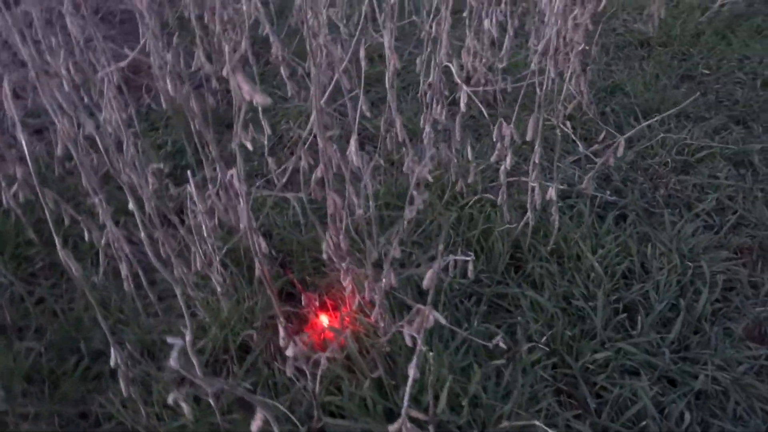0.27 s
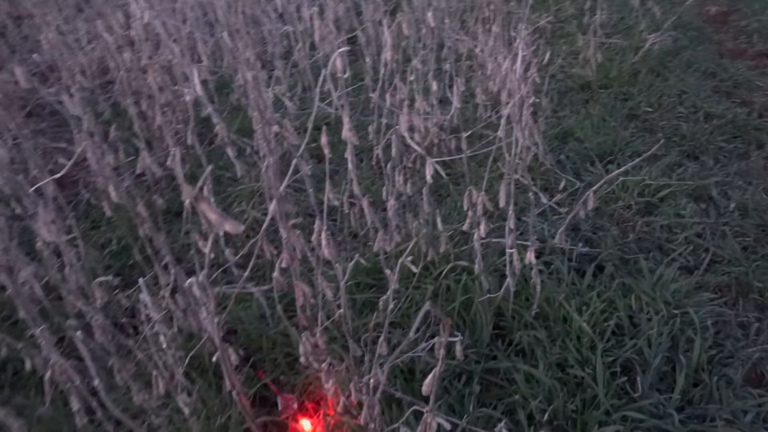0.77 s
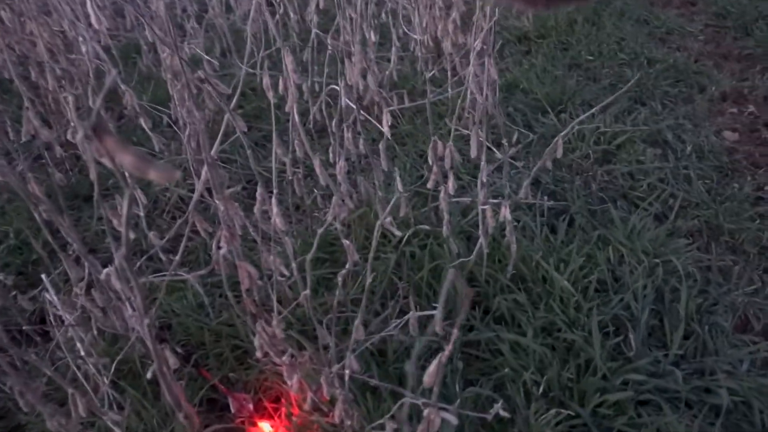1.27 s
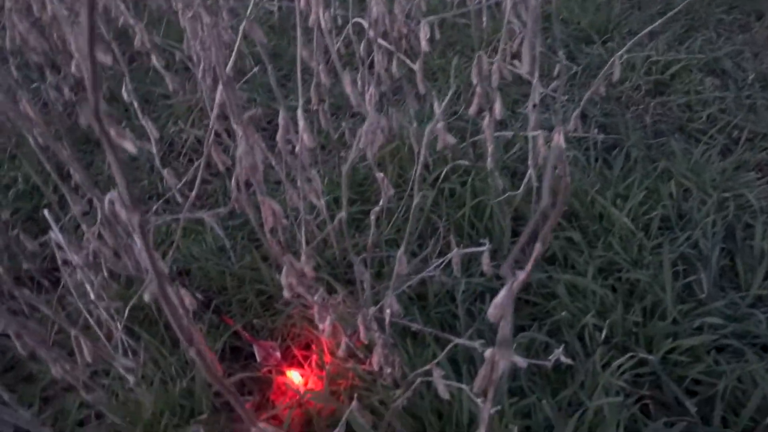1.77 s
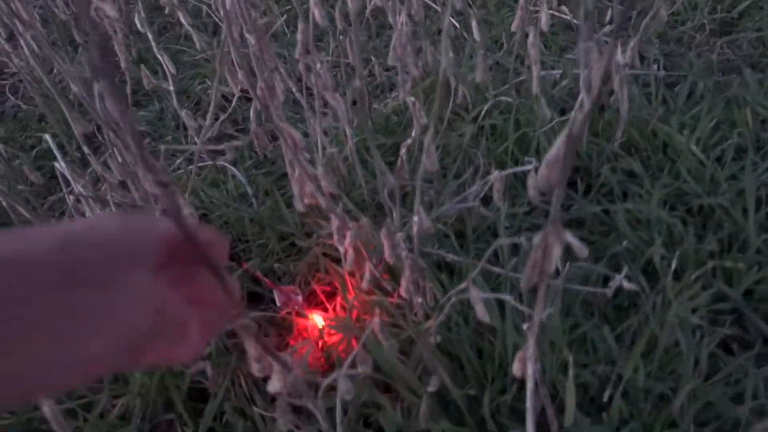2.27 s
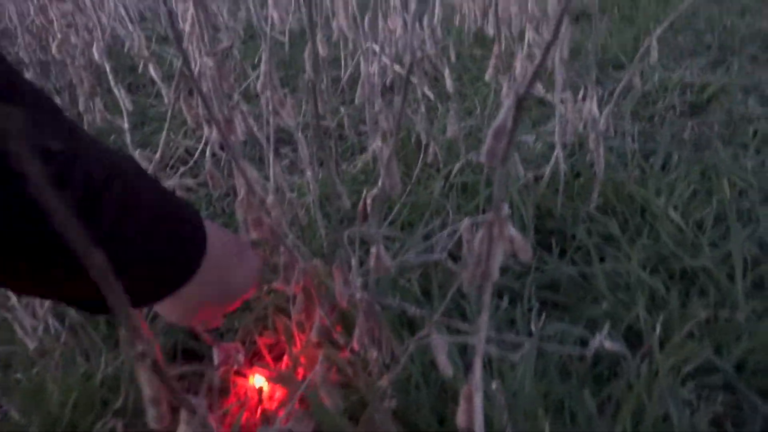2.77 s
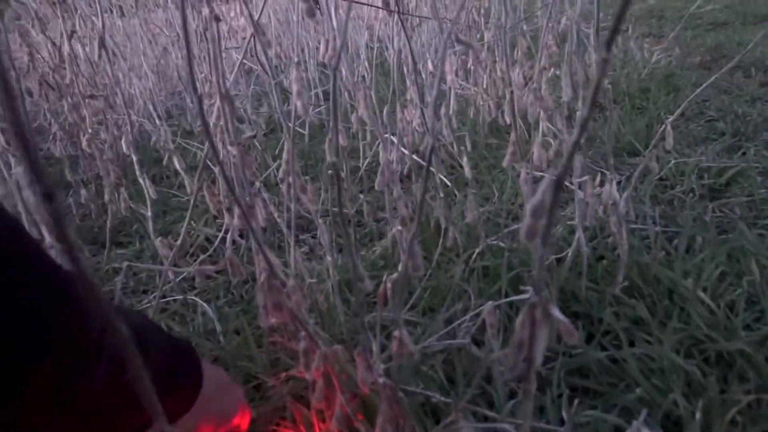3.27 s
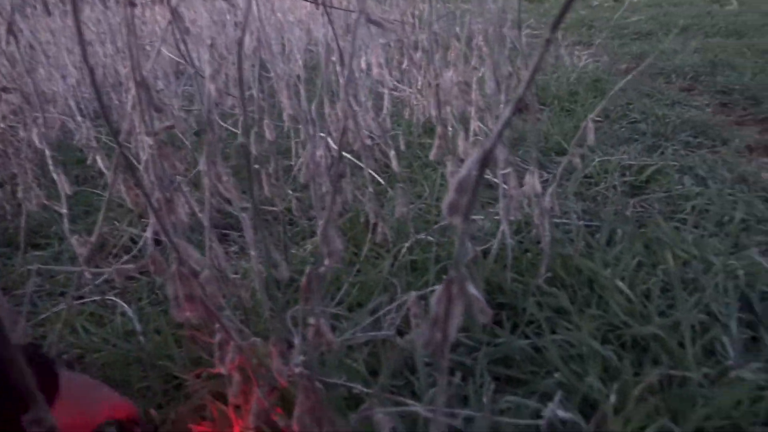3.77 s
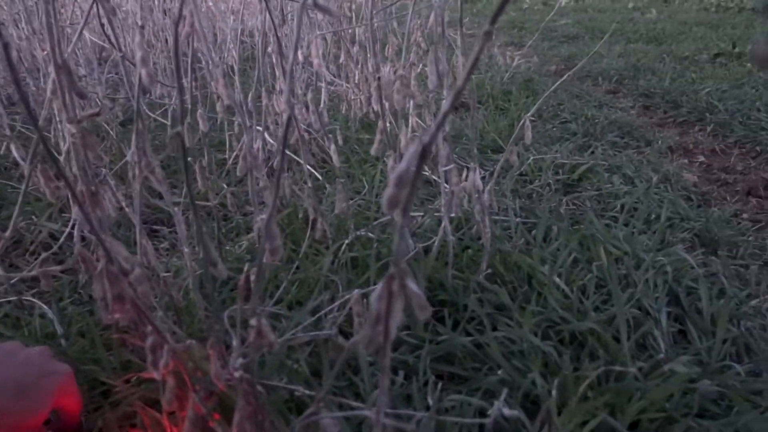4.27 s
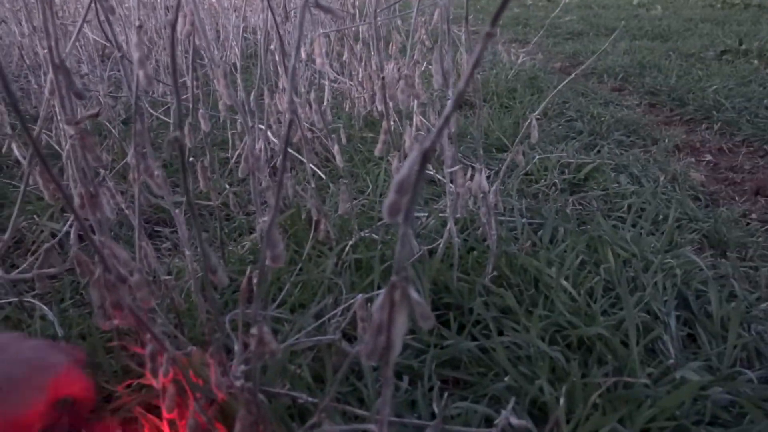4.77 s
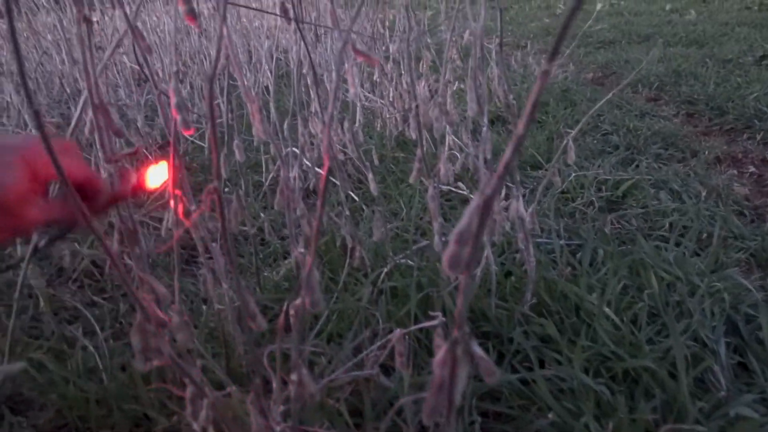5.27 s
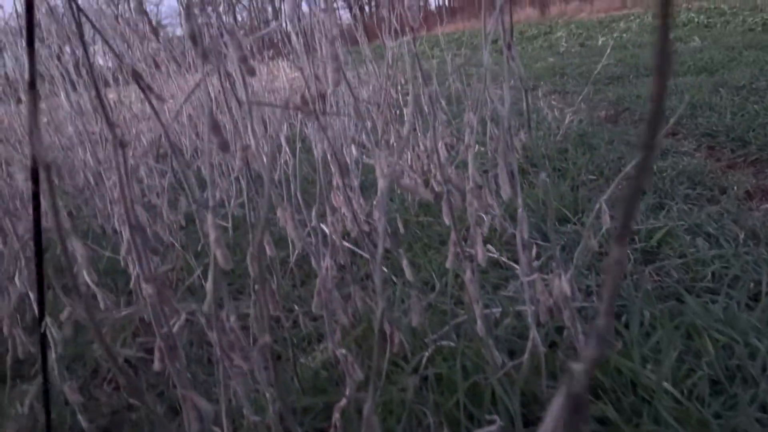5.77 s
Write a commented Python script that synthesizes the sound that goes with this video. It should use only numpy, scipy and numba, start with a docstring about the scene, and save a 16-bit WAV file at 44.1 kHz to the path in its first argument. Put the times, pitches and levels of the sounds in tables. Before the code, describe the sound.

Dry stalks and seed pods rustle and snap as someone reaches in with a small camera, dull body knocks, quiet open field behind.

```python
"""Pods and cloth rustle and stalks snap as someone crouches among dry bean plants with a small camera.
The field around is quiet: a smooth distant hiss and a faint far hum, made of shaped noise and two sines.
The camera body takes dull knocks (damped, falling sines) and rumbles and creaks in the hand (low noise).
Scrapes and snaps are noise in resonances, some narrow, some broad; each stroke through the plants is
crackle and hiss ringing in pods, thin husks and stems. All reaches the one microphone, in the camera."""
import sys
import numpy as np
from scipy import signal
from scipy.fft import rfft, irfft
from scipy.io import wavfile
from scipy.ndimage import uniform_filter1d
from numba import njit

SR = 44100
rng = np.random.default_rng(int(sys.argv[2]) if len(sys.argv) > 2 else 0)


def transcribe(signal):
    """Save signal, clipped to [-1, 1], as a 16-bit WAV file at the path in sys.argv[1]."""
    frames = np.atleast_2d(signal).T
    limited = np.clip(frames, -1, 1)
    pcm = np.round(limited * 32767).astype(np.int16)
    wavfile.write(sys.argv[1], SR, pcm)


N = 265482  # samples, about 6 s


def undb(db):
    """Gain of a dB value."""
    return 10 ** (np.asarray(db) / 20)


def unit(x):
    """Scaled to rms 1."""
    return x / np.sqrt(np.mean(x ** 2))


def curves(table):
    """Columns of a table joined by straight lines, one value a sample."""
    s, *columns = np.transpose(table)
    t = np.arange(N) / SR
    return [np.interp(t, s, column) for column in columns]


@njit
def svf(x, hz, width):
    """State-variable band-pass, gain 1 at the centre; hz and width in Hz."""
    y, band, low = np.empty(len(x)), 0., 0.
    g, damping = np.tan(np.pi * hz / SR), width / hz
    for i in range(len(x)):
        v = (band + g * (x[i] - low)) / (1 + g * (g + damping))
        band = 2 * v - band
        low = low + 2 * g * v
        y[i] = damping * v
    return y


def steep(x, hz, width):
    """The band-pass applied twice."""
    hz, width = 1. * hz, 1. * width
    return svf(svf(x, hz, width), hz, width)


def walk(rate):
    """Random levels, rate of them a second, joined by straight slopes; rms 1."""
    k = int(SR / rate)
    steps = np.repeat(rng.standard_normal(N // k + 1), k)
    return unit(uniform_filter1d(steps, k)[:N])


def add(out, s, sound):
    """Mix a sound in from second s."""
    i = int(s * SR)
    out[i:i + len(sound)] += sound[:N - i]


# Colour of the distant hiss, joined over log pitch: pitch_hz [Hz], relative_level_db [dB per Hz]
HISS_COLOUR = [(35, -33), (60, -8), (168, -53), (238, 12), (389, 1), (1220, -10), (5210, -32), (14600, -13),
               (16000, -11)]
# Lines of the far hum: pitch_hz [Hz, wavering], level_db [dB, sine peak, wavering]
HUM_LINES = [(117, -61), (233, -57)]
HISS_DB = -59.5  # rms


def field():
    """Far off: smooth noise of a fixed colour, and sines whose pitch wanders together, each level alone."""
    hz, db = np.transpose(HISS_COLOUR)
    bins = np.arange(N // 2 + 1) * SR / N + 1  # 1 Hz up, so that the log exists
    colour = undb(np.interp(np.log(bins), np.log(hz), db))
    hiss = irfft(rfft(rng.standard_normal(N)) * colour, N)
    drift = np.cumsum(1 + 0.00637 * walk(5.1)) / SR  # time running slightly unevenly, s
    hum = np.zeros(N)
    for line_hz, line_db in HUM_LINES:
        hum += undb(line_db + 2.4 * walk(3.8)) * np.sin(2 * np.pi * line_hz * drift)
    return undb(HISS_DB) * unit(hiss) + hum


# Grip and air moving at the microphone, points on two level curves:
# time_s [s], rumble_db [dB, deep rumble], creak_db [dB, low creak]
GRIP_LEVELS = [(0.0, -43.5, -55), (0.4, -49.5, -50), (0.76, -47.5, -55.5), (1.25, -48.5, -48.5),
               (1.85, -45.5, -53), (2.18, -43.5, -54.5), (2.34, -41.5, -45), (2.44, -37, -37.5),
               (2.53, -52, -41), (2.69, -45, -45.5), (2.77, -43, -32.5), (2.84, -27, -44),
               (3.02, -39, -43.5), (3.14, -42.5, -50.5), (3.64, -43.5, -49.5), (3.82, -50, -47),
               (4.11, -45.5, -53), (4.85, -50.5, -52), (5.08, -36.5, -43), (5.2, -46, -46.5),
               (5.6, -46, -43.5), (5.72, -48, -48), (5.82, -45, -43), (6.02, -41, -47)]


def handling():
    """At the microphone: deep rumble and a low, uneven creak carried through the camera body."""
    rumble_db, creak_db = curves(GRIP_LEVELS)
    rumble = steep(rng.standard_normal(N), 30.8, 27.7)
    creak = steep(rng.standard_normal(N), 91, 290)
    creak = creak * undb(4.4 * np.tanh(walk(25)))
    return undb(rumble_db) * unit(rumble) + undb(creak_db) * unit(creak)


# Knocks on the camera body: start_s [s], level_db [dB, envelope peak], pitch_hz [Hz, lowest mode at the blow],
# t60_s [s to fade 60 dB], drop_octaves [octaves the pitch falls in the end]
BODY_KNOCKS = [(.431, -25.5, 338, 0.092, 0.45), (0.904, -33.5, 328, 0.035, 0.27),
               (0.9409, -24.5, 587, 0.0054, .2), (1.012, -36.5, 533, 0.045, 0.12),
               (1.2327, -27, 325, 0.023, .5), (1.244, -33.5, 296, .06, 0.38),
               (1.372, -33, 333, 0.0093, 0.75), (1.83, -24, 357, 0.042, 0.87),
               (2.74, -30, 140, 0.053, 0.43), (2.759, -22.5, 304, 0.023, 0.72),
               (2.771, -16.5, 47, 0.27, 0.27), (2.916, -32.5, 309, 0.062, 0.28),
               (3.051, -31.5, 131, 0.11, 0.99), (3.257, -24.5, 172, 0.034, 2.9),
               (4.293, -31.5, 130, 0.054, 1.2), (5.51, -23.5, 230, 0.1, 2.6),
               (5.646, -28.5, 221, 0.075, 0.27), (5.668, -10.5, 264, 0.066, 0.78),
               (5.670, -22, 830, 0.029, 0.65), (5.677, -10.5, 141, 0.028, 1.9),
               (5.974, -20, 223, 0.056, 2.5)]


def knocks():
    """A few damped swings that slow down as the blow is absorbed; higher shell modes die sooner."""
    out, t = np.zeros(N), np.arange(16000) / SR
    for s, db, hz, t60, drop in BODY_KNOCKS:
        octaves = -drop * (1 - np.exp(-t / 0.011))
        turns = np.cumsum(hz * 2 ** octaves) / SR
        fade = np.exp(-np.log(1000) * t / t60)
        shape = (1 - np.exp(-t * hz / 0.82)) * fade  # low pitches set in more slowly
        shell = np.sin(2 * np.pi * 1.366 * turns) + 0.33 * np.sin(2 * np.pi * 2.44 * turns)
        swing = np.sin(2 * np.pi * turns) + .5 * fade * shell
        add(out, s, undb(db) * shape / shape.max() * swing)
    return out


# Short rough scrapes and squeaks, and a low rattling rumble: start_s [s], length_s [s], pitch_hz [Hz],
# width_hz [Hz, of each of two filter passes], level_db [dB, rms before the swell]
ROUGH_SCRAPES = [(1.717, 0.086, 4940, 900, -42.5), (2.286, 0.028, 4700, 2000, -30.5),
                 (2.289, 0.027, 8800, 5000, -35.5), (2.36, 0.14, 110, 129, -27),
                 (2.429, 0.083, 5240, 500, -36.5), (4.228, 0.032, 3960, 4200, -35.5),
                 (5.089, 0.074, 4900, 600, -28), (5.017, 0.17, 280, 96, -43),
                 (5.467, 0.048, 5200, 2000, -27), (5.766, 0.024, 1370, 300, -31)]


def scrapes():
    """Rough noise in one resonance, narrow or broad, under a smooth swell and fade."""
    out = np.zeros(N)
    noises = rng.standard_normal((len(ROUGH_SCRAPES), 2, 8000))
    for (s, length, hz, width, db), noise in zip(ROUGH_SCRAPES, noises):
        n = min(int(length * SR), 8000)
        slips = undb(42 * uniform_filter1d(noise[1], size=100))  # the grip catches and lets go
        rough = unit(steep(slips * noise[0], hz, width))
        add(out, s, undb(db) * np.hanning(n) * rough[:n])
    return out


# Stalks and pods that snap: start_s [s], level_db [dB, peak of the ring alone], pitch_hz [Hz, ring],
# dull_db and bright_db [dB, peaks of the dull and bright parts relative to the ring]
STALK_SNAPS = [(0.6662, -34.5, 6100, -12, -12), (0.7094, -35.5, 7000, -4, -12),
               (0.7597, -36, 4400, -21, -23), (0.783, -37.5, 3430, -18, -6), (1.1186, -20, 3500, 4, 0.5),
               (1.4056, -38, 2370, -7, 7.5), (1.2468, -38, 1110, 10, 2), (1.6896, -33, 4840, -5, -17),
               (1.8429, -14.5, 6300, -21, -17), (2.0869, -31.5, 3860, 1, 1), (2.1795, -21, 4700, -3, 3.5),
               (2.2081, -24, 4300, -18, -22), (2.2457, -24, 3400, 2, 8), (2.509, -28.5, 4330, -17, 14.5),
               (2.543, -30.5, 4300, -8, 10), (2.602, -20.5, 4400, -16, -34), (2.6498, -23, 5260, -5.5, 2),
               (2.744, -24, 6000, -19, 5), (2.75, -6, 5400, -16, -12), (2.7594, -9.5, 4100, -18, 0.5),
               (2.7753, -9.5, 5300, -28, -8), (2.791, -22, 5200, -21, -9), (2.8058, -13.5, 5100, -26, -12),
               (2.817, -27, 5400, -8, -19), (2.8478, -22, 3460, -11, 8), (2.924, -14.5, 5070, -26, -9),
               (2.9879, -22, 3900, -20, 4), (3.0096, -21, 1900, -31, -24), (3.28, -31.5, 4000, -17, -3),
               (3.3702, -34, 3400, -15, 0), (3.406, -15, 2200, -17.5, -15), (3.6647, -29.5, 5360, -11, 6),
               (3.748, -31, 2600, -18, -11), (3.7793, -9, 3200, -3.5, 5.5), (3.841, -23.5, 3260, -17, -21),
               (3.8587, -18.5, 3150, -26, -14), (3.888, -23.5, 3900, -16, -19),
               (3.912, -22.5, 3280, -32, -22), (3.9524, -32.5, 3740, -21, -27),
               (3.9844, -21, 3240, -14, -16), (4.017, -23, 4200, -15, -24), (4.3733, -28, 4000, -9, 8),
               (4.4899, -32, 5100, -21, -3), (4.5581, -25.5, 4180, -15, 3), (5.0503, -22.5, 2600, -25, -4),
               (5.1088, -19, 4700, -18, -22), (5.1358, -22, 4640, -27, -19), (5.2, -15.5, 4200, -25, -28),
               (5.4825, -14.5, 4770, -9.5, 1), (5.6946, -22.5, 3370, -20, -23),
               (5.7895, -10, 3150, -22, -29), (5.9363, -19, 5500, -22, -13),
               (5.9563, -23.5, 1580, -27, -14), (5.974, -11, 9150, -19, -14),
               (5.992, -11.5, 8950, -29, -14), (6.0083, -12, 4070, -18, 1)]
SNAP_T60_S = 0.032  # of the splinters, before the filters
BROAD_HZ = 3400  # thicker stalks, pitched below this, ring more narrowly


def snaps():
    """One clean crack, then uneven splinters that die away, the treble first; each rings in its own band."""
    out, t = np.zeros(N), np.arange(3000) / SR
    crack = 7.7 * (t == 0)
    fade = np.exp(-np.log(1000) * t / SNAP_T60_S)
    noises = rng.standard_normal((len(STALK_SNAPS), 2, 3000))
    for (s, db, hz, dull_db, bright_db), noise in zip(STALK_SNAPS, noises):
        splinters = noise[0] * undb(12.5 * uniform_filter1d(noise[1], size=30))
        width = hz * min(hz / BROAD_HZ, 1.03)
        parts = [steep(crack + splinters * fade, hz, width),
                 steep(crack + 0.087 * splinters * fade, 700, 1180),
                 steep(crack + splinters * fade ** 2.0, 10500, 16000)]
        ring, dull, bright = (p / np.abs(p).max() for p in parts)
        # neighbouring bands swing opposite, so the crack is even across their overlap
        add(out, s, undb(db) * (ring - undb(dull_db) * dull - undb(bright_db) * bright))
    return out


# Strokes of arm and body through the plants: start_s [s, fullest from here],
# swell_s [s to rise by SWELL_DB], hold_s [s], fade_s [s to fall by SWELL_DB],
# pods_db, husks_db, stems_db [dB, at the fullest]
BODY_STROKES = [(0.2, 0.44, 0.072, 0.13, -58, -68, -59), (0.911, 0.17, 0.043, 0.18, -42, -45, -46),
                (1.056, .2, 0.21, 0.095, -48, -52, -49), (1.35, 0.13, 0.11, 0.73, -59, -66.5, -56),
                (1.749, 0.14, 0.016, 0.26, -43, -45, -46.5), (2.092, 0.75, 0.19, .3, -54, -64, -57.5),
                (2.303, .06, .01, 0.12, -51, -46.5, -47), (2.445, 0.19, 0.016, 0.15, -39.5, -44.5, -45),
                (2.524, 0.084, .01, 0.19, -42, -49, -48.5), (2.755, 0.021, .02, 0.062, -32, -35, -34.5),
                (2.847, 0.13, 0.097, 0.21, -38.5, -45.5, -48),
                (3.186, 0.74, 0.066, 0.34, -53.5, -56.5, -58), (3.407, 0.14, .01, 0.27, -48, -53, -55),
                (3.687, 0.24, .07, 0.22, -47.5, -54.5, -51.5), (3.796, 0.087, 0.039, 0.17, -45, -62, -46),
                (4.02, 0.17, .1, 0.41, -50.5, -60, -55.5), (4.242, 0.21, .01, 0.11, -46, -56, -49),
                (4.33, .03, .025, .04, -46, -56, -48), (4.4, 0.071, .045, .04, -47, -53, -59),
                (4.859, 0.13, 0.091, 0.16, -43.5, -65, -59), (5.044, .25, 0.059, 0.14, -35.5, -43.5, -45.5),
                (5.257, 0.21, 0.019, 0.11, -32, -42, -46), (5.331, .1, 0.13, 0.16, -35, -46, -51),
                (5.495, 0.056, .01, 0.17, -27.5, -56, -49), (5.686, .2, 0.089, .2, -32, -61, -46.5),
                (5.848, 0.2, 0.011, 0.084, -34, -34, -52), (5.958, 0.14, 0.022, .2, -31.5, -47, -58)]
# Plants stirring between strokes: pods_db, husks_db, stems_db [dB]
STIR_DB = (-62.5, -66.5, -59.5)
SWELL_DB = 20


def strokes():
    """Gains of pods, husks and stems: each stroke swells, holds and fades, its power added to the stir."""
    t = np.arange(N) / SR
    power = undb(STIR_DB)[:, None] ** 2 * np.ones(N)
    for s, swell, hold, fade, *db in BODY_STROKES:
        down = np.maximum(s - t, 0) / swell + np.maximum(t - s - hold, 0) / fade
        shape = undb(-SWELL_DB * np.minimum(down, 5))
        power = power + (undb(db)[:, None] * shape) ** 2
    return np.sqrt(power)


def crackle(per_s, scatter_db, tail_s):
    """Noise opened by tiny fractures: many small, few large, each with a sharp start and short tail."""
    when, size = rng.random(N), rng.exponential(size=N)
    starts = (when < per_s / SR) * undb(scatter_db * np.minimum(size, 5))
    opening = signal.lfilter([1], [1, -np.exp(-1 / (tail_s * SR))], starts)
    return unit(opening * rng.standard_normal(N))


# Resonances of the brushed pods: pitch_hz [Hz], width_hz [Hz], relative_level_db [dB]
POD_RINGS = [(1900, 1560, 0.5), (2710, 1450, -2.5), (3900, 2100, -0.5), (5200, 590, 1.5), (7100, 2900, -9)]


def brushing():
    """Closest: crackle over a flickering hiss, heard through pods, thin husks and stems."""
    pod, husk, stem = strokes()
    shared = crackle(per_s=600, scatter_db=5.0, tail_s=0.0018)
    surge_db = 1.46 * walk(45)  # stalks catch on the sleeve and spring free

    def grain(own_db):
        """The common crackle, plus crackle and hiss of this part's own: the colour keeps shifting."""
        own = undb(own_db) * crackle(per_s=280, scatter_db=3.5, tail_s=0.0023)
        flicker = undb(surge_db + 0.98 * walk(20))
        return flicker * (shared + own + 1.94 * rng.standard_normal(N))

    pods = np.zeros(N)
    for hz, width, db in POD_RINGS:
        pods += undb(db) * svf(grain(own_db=9.0), 1. * hz, 1. * width)
    husks = steep(grain(own_db=8.5), 8700, 6900)
    husks = husks + 0.95 * steep(grain(own_db=-11.0), 13200, 7700)
    stems = steep(grain(own_db=4.0), 915, 1770)
    stems = stems + 1.59 * svf(grain(own_db=9.5), 549.0, 99.0)
    return pod * unit(pods) + husk * unit(husks) + stem * unit(stems)


def scene():
    """Everything as it reaches the one microphone."""
    plants = brushing() + snaps() + scrapes()
    return (plants + knocks() + handling() + field())[None]


PEAK = .8  # amplitude the rounding never passes
TOP_HZ = 15900  # edge of the steep low-pass


def record(dry):
    """The camera rounds the sharpest peaks and cuts the top."""
    rounded = PEAK * np.tanh(dry / PEAK)
    low_pass = signal.ellip(8, .2, 70, TOP_HZ, fs=SR, output="sos")
    return signal.sosfilt(low_pass, rounded)


dry = scene()
out = record(dry)
transcribe(out)
```